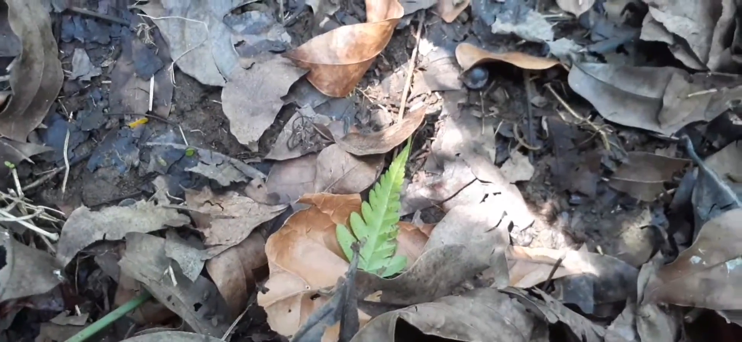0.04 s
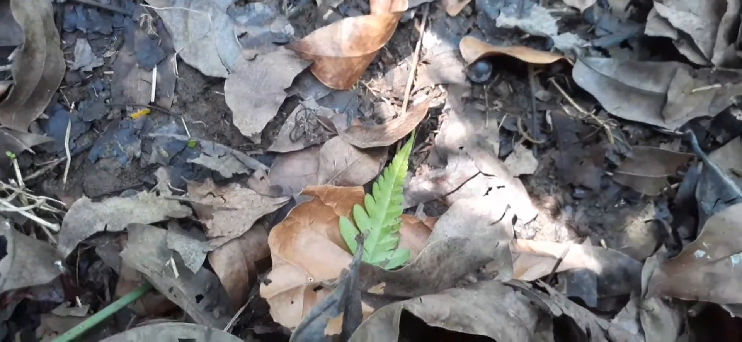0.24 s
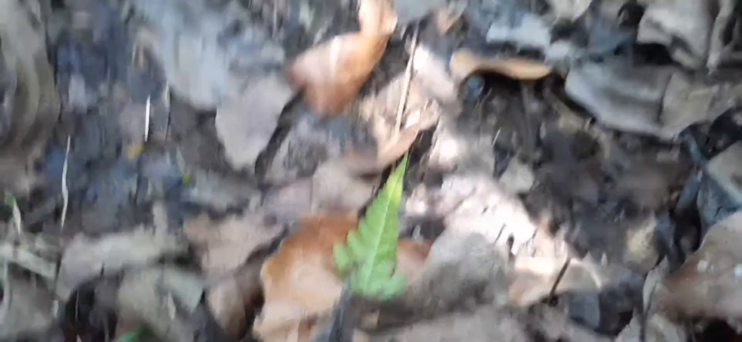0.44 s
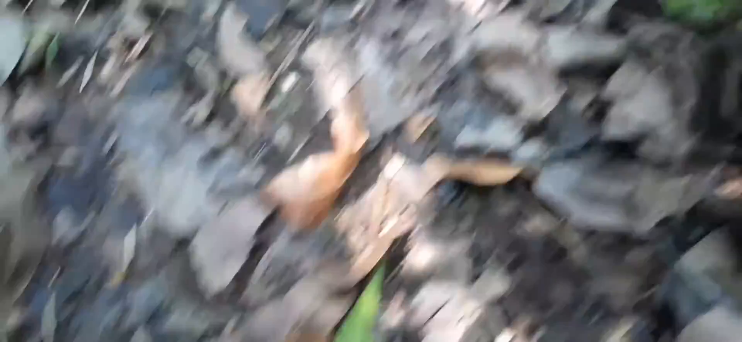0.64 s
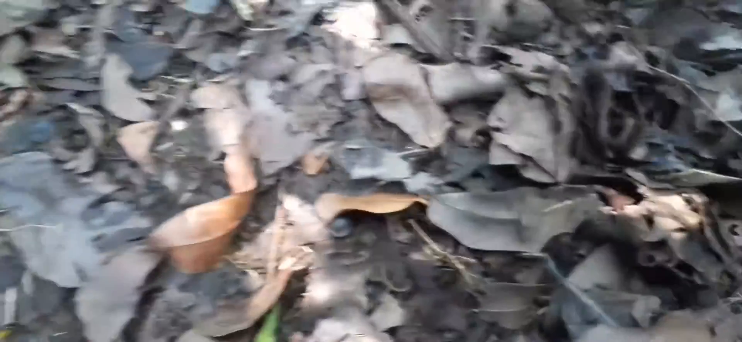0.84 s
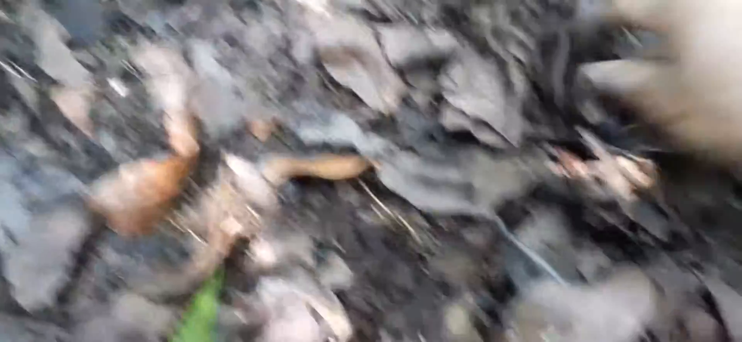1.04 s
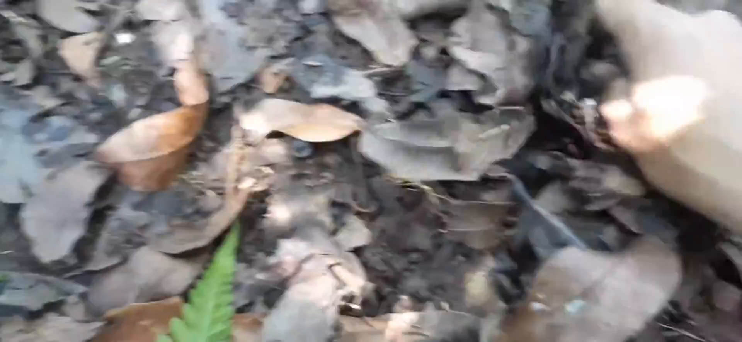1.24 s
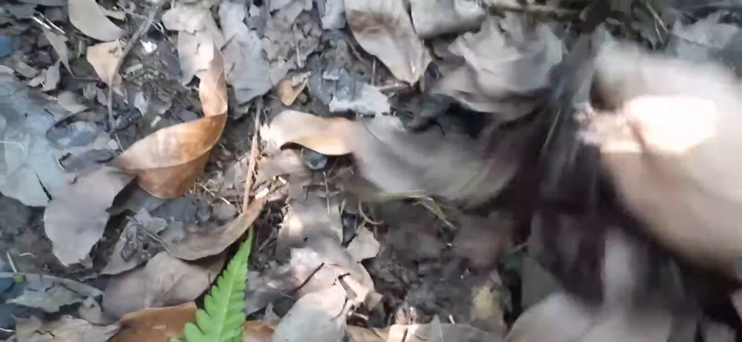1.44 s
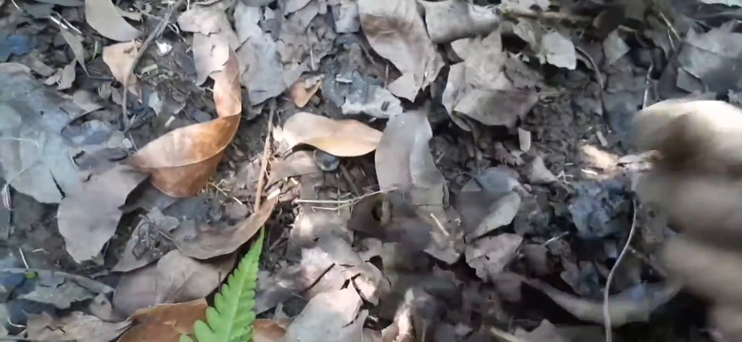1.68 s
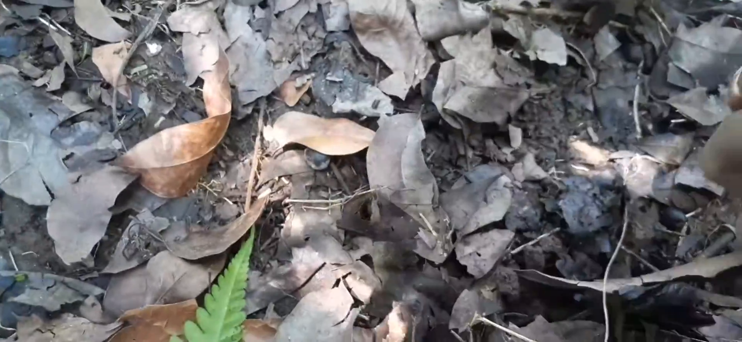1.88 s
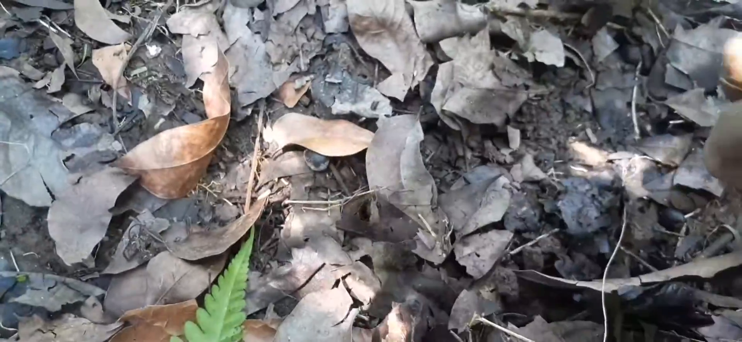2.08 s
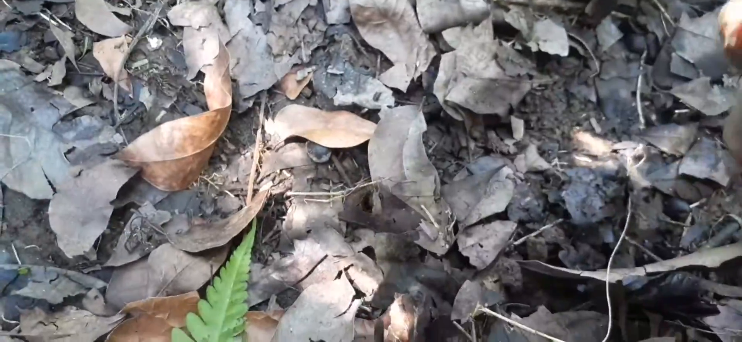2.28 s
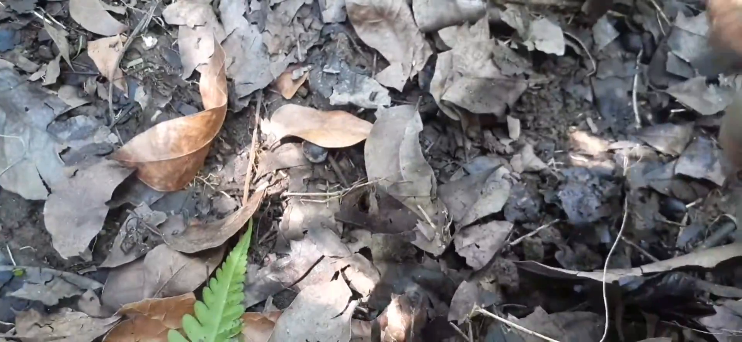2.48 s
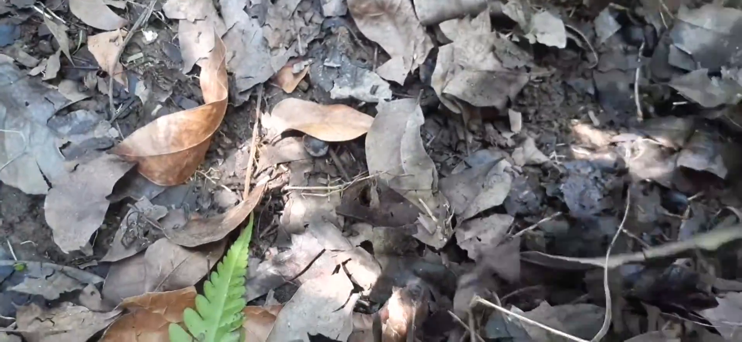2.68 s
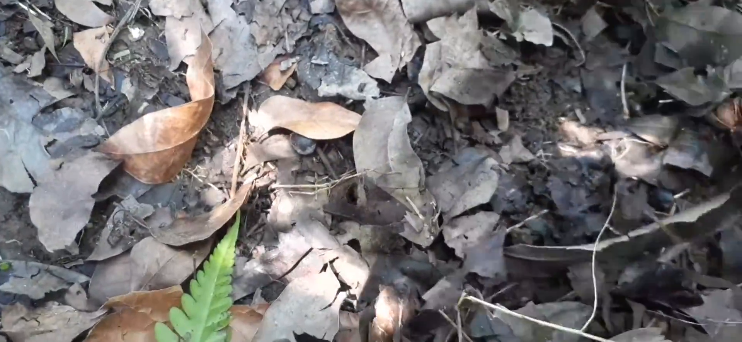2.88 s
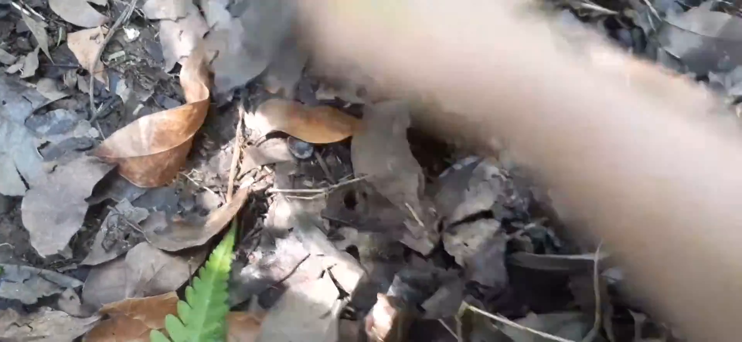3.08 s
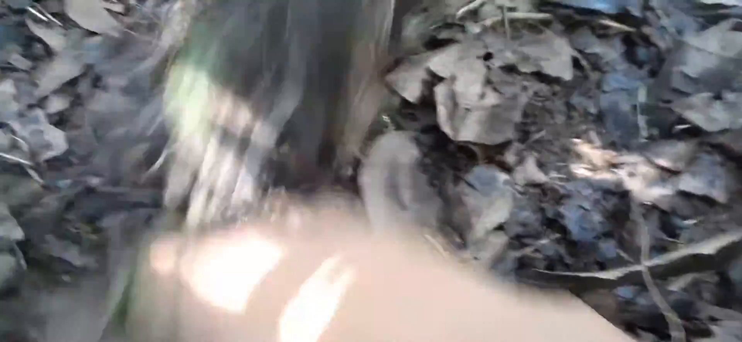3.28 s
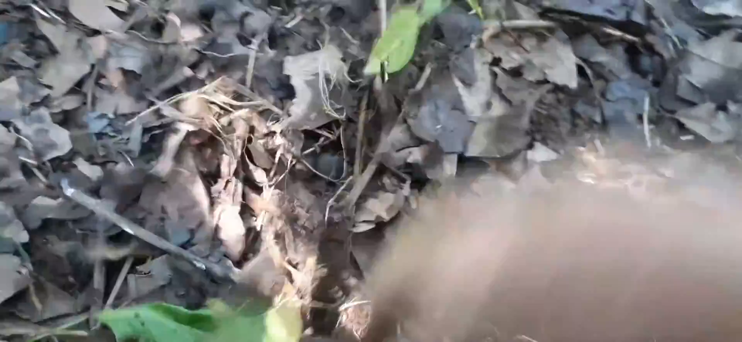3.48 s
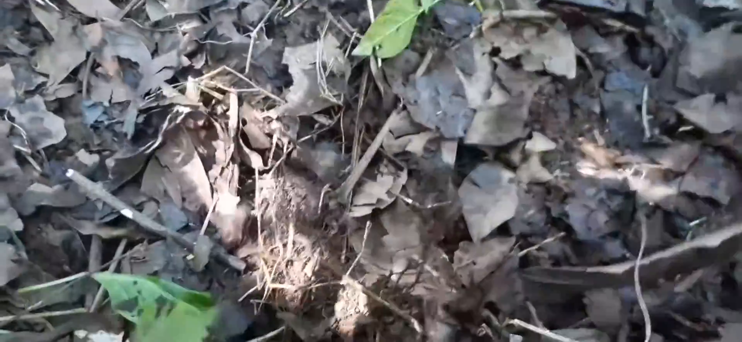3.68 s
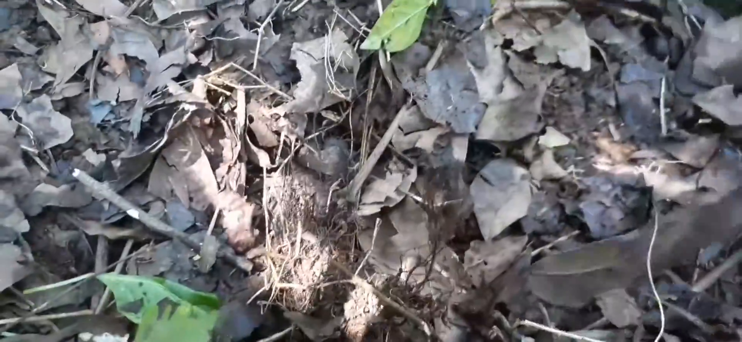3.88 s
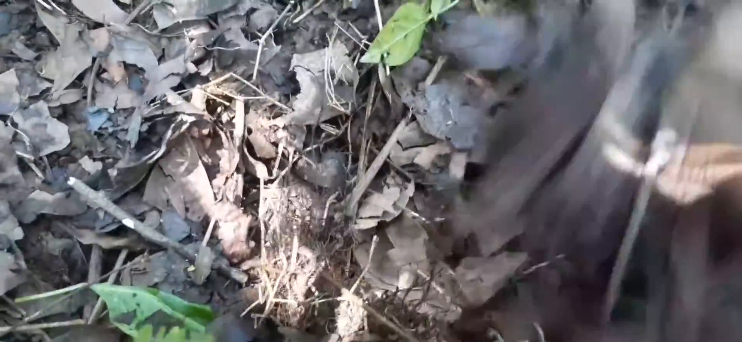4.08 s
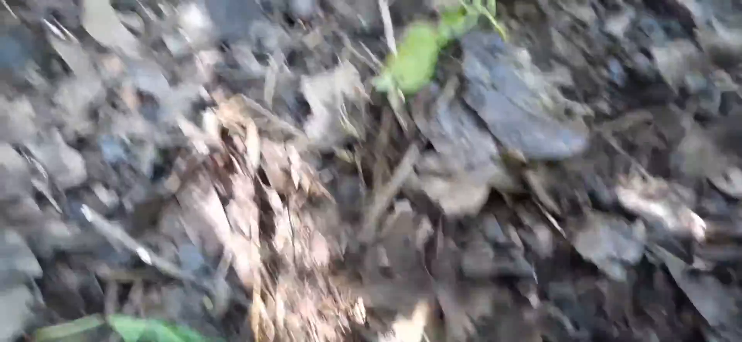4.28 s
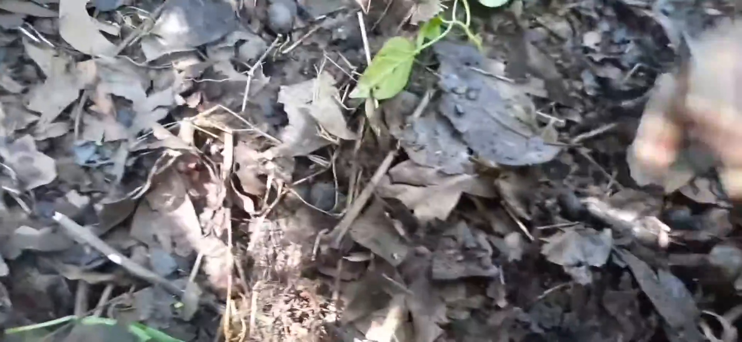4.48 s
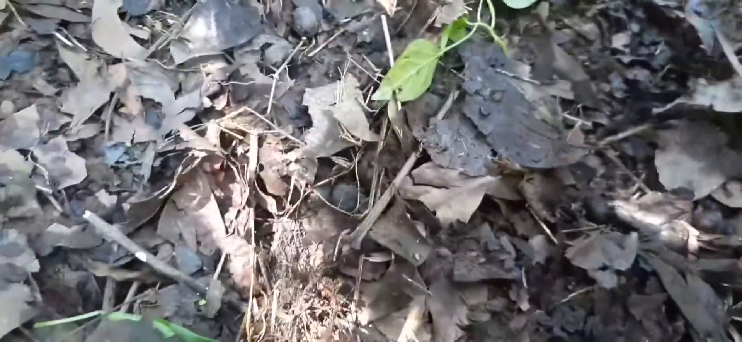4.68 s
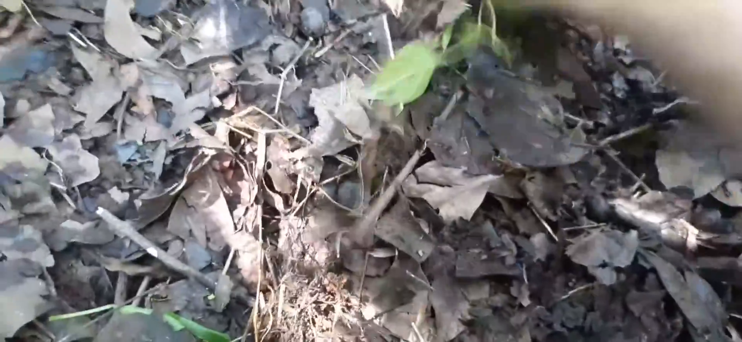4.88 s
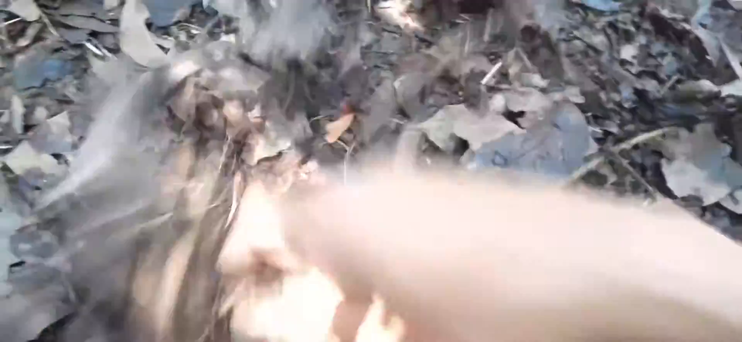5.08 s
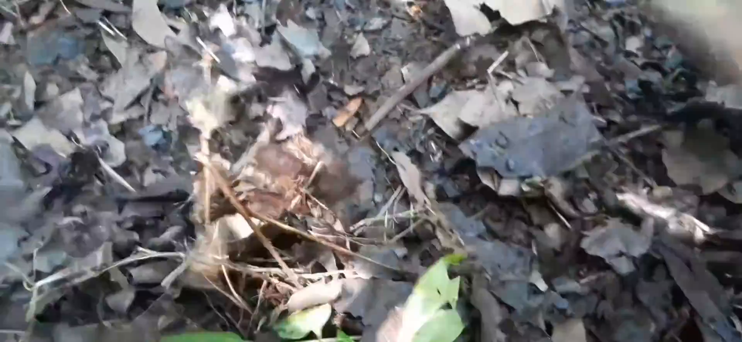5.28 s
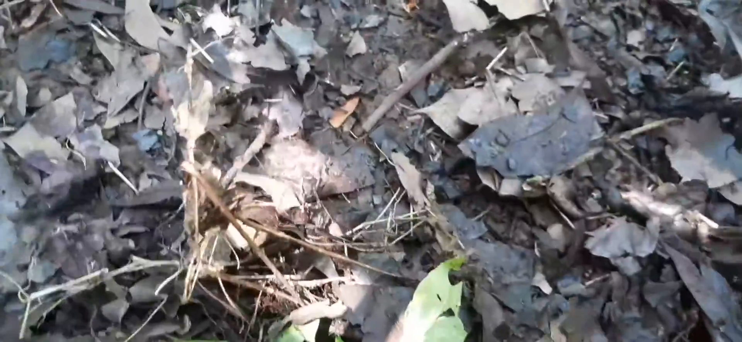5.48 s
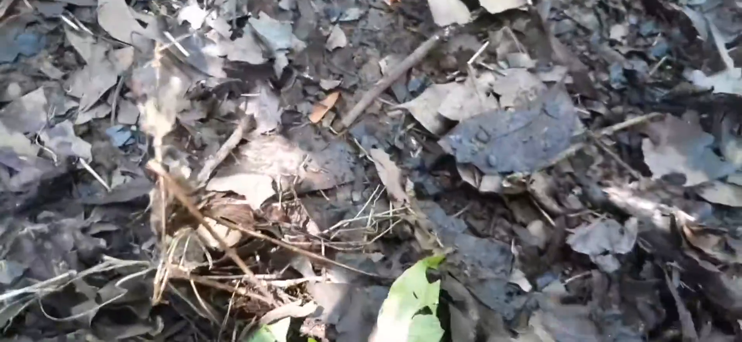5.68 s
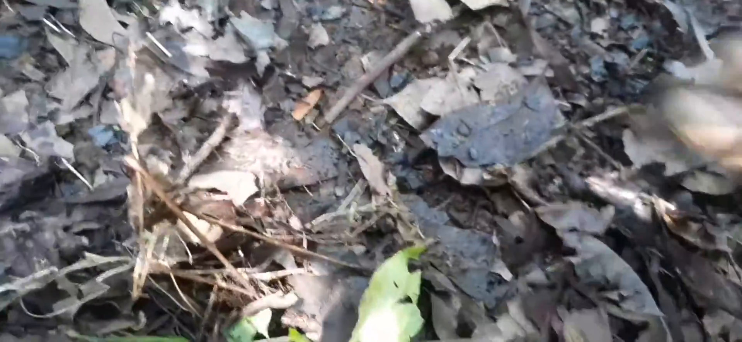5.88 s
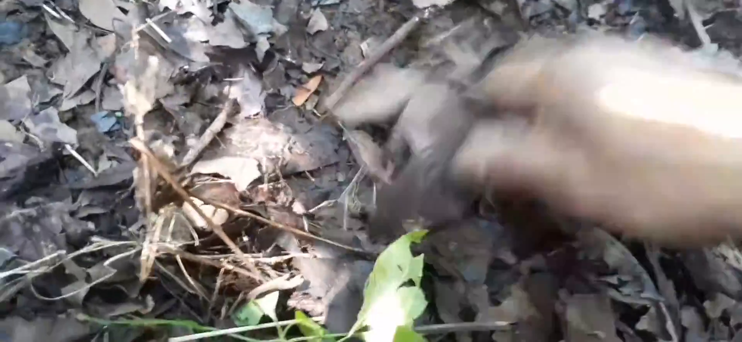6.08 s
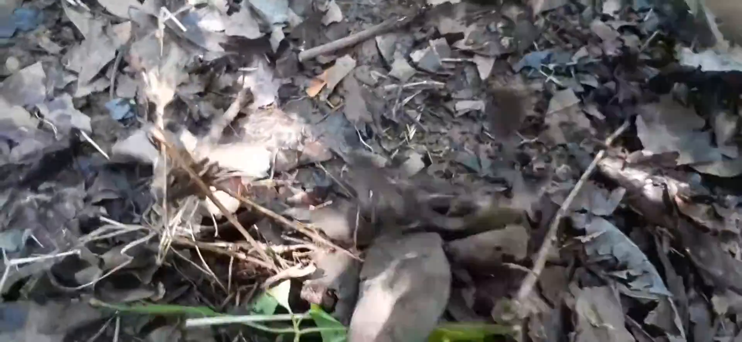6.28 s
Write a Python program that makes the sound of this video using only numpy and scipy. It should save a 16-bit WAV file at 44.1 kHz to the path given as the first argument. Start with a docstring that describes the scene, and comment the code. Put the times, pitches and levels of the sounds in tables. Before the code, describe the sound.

Dry fallen leaves crackle and rustle as a hand pushes them aside in separate, irregular sweeps, heard from very near and slightly to the left. The scratching starts softly, pauses briefly, then returns with fuller crunching and many small cracks of breaking stems. The woodland around is quiet, with only a faint distant engine hum, high insect hiss and softly rumbling air.

```python
"""On a forest floor, close to a small pair of microphone ports, a hand rakes dry leaves in separate pushes.
Each push is a shower of tiny impacts exciting damped resonances: leaf edges crackle, curled leaves
rustle hollow and soil shifts beneath. Single stems and leaves snap with a crack and a short knock.
A far engine drones in harmonics of its firing rate, insects hiss high in the trees, and the air rumbles."""
import sys
import numpy as np
from scipy import signal
from scipy.io import wavfile

SR = 44100
rng = np.random.default_rng(int(sys.argv[2]) if len(sys.argv) > 2 else 0)


def unload_audio(sound):
    """Save the sound as a 16-bit wav file, at the path given as the first command line argument."""
    columns = np.transpose(np.atleast_2d(sound))
    # keep every value between -1 and 1, then stretch to whole-number steps
    steps = np.round(np.clip(columns, -1, 1) * 32767)
    wavfile.write(sys.argv[1], SR, steps.astype(np.int16))


N = 279572

# Pushes of the hand: t/s at full force, rise/s, hold/s, fall/s, crackle level/dB,
# hollow level/dB and soil level/dB (both relative to the crackle), left-right/dB, cupped f/Hz, its lift/dB
PUSHES = [(0.0, 0.3, 0.067, 0.1, -43.5, -10.5, -17.5, 0, 2100, 10),
          (0.083, 0.093, 0.024, 0.14, -41.5, -11.5, -13, 1, 2190, 19),
          (0.139, 0.12, .036, 0.038, -42.5, -12.5, -9.5, 0, 2360, 18.5),
          (0.38, 0.23, 0.01, 0.23, -61, -10, -25, 4, 2200, 0),
          (0.577, 0.15, .03, 0.1, -56.5, -6.5, -18, 5, 2070, 6.5),
          (0.623, 0.038, 0.064, 0.073, -45.5, -8.5, -21.5, 4.5, 1950, 3.5),
          (0.79, 0.27, 0.015, 0.22, -55, -9, -19, 6, 2000, 4.5),
          (1.124, 0.19, 0.036, 0.086, -45, -7.5, -23, 3.5, 2120, 7.5),
          (1.192, 0.089, 0.019, 0.23, -50, -6, -16, 2.5, 2030, 5.5),
          (1.478, 0.16, 0.078, 0.29, -33, -7.5, -20, 1.5, 1850, 8.5),
          (1.659, 0.37, 0.057, 0.074, -42.5, -4, -15, 4, 1710, 0),
          (2.696, 0.029, 0.021, 0.16, -52, 0, -9, 3.5, 1950, 8),
          (3.024, 0.12, 0.047, 0.21, -36, -2.5, -25.5, 6.5, 2080, 0.5),
          (3.13, 0.25, 0.025, 0.52, -27.5, -7, -20.5, 9, 2250, -3),
          (3.325, 0.28, 0.055, 0.33, -29, -7, -13, 6.5, 2420, 4.5),
          (3.487, 0.17, 0.035, 0.19, -37.5, -4, -12, 6.5, 2000, -2),
          (3.712, .12, 0.081, 0.14, -55, -9, -35, 2.5, 2000, 7),
          (3.85, 0.074, 0.029, 0.32, -33.5, -8, -23, 2.5, 1830, -2),
          (3.968, 0.17, 0.032, 0.14, -35, -5.5, -17, 3.5, 1724, 3),
          (4.158, 0.28, 0.08, 0.32, -29, -4.5, -16.5, 3.5, 1930, 2),
          (4.904, 0.2, 0.054, 0.19, -37.5, -6, -22.5, 5.5, 2400, 2.5),
          (5.051, 0.28, 0.034, 0.087, -30, -10.5, -23, 9.5, 2290, -4.5),
          (5.128, 0.099, 0.024, 0.28, -37, -5.5, -20.5, 8.5, 2200, 2),
          (5.494, 0.14, 0.2, 0.17, -32.5, -7.5, -20, 1, 1820, 4),
          (5.806, 0.098, 0.057, 0.22, -45, -6.5, -14.5, -0.5, 1700, 1.5),
          (5.916, 0.093, 0.025, 0.14, -47, -10, -20, 1, 1650, 9),
          (6.122, 0.092, 0.038, 0.11, -33.5, -8, -22.5, 8, 2560, 2.5),
          (6.293, 0.12, .05, .1, -59, -8.5, -24, 9, 2500, 2)]
# Spectra of leaf edges, curled leaves and soil: f/Hz, relative level/dB
CRACKLE_SPECTRUM = [(2500, -16), (3500, -4), (5500, -4.5), (7000, -7), (8200, -3), (9800, 0), (12000, -2.5),
                    (15500, -3.5)]
HOLLOW_SPECTRUM = [(600, -16.5), (900, -8.5), (1400, -0.5), (2100, -1), (2800, 0.5), (4000, -34)]
SOIL_SPECTRUM = [(55, 3), (80, 4.5), (150, -2.5), (300, 0), (550, -2), (900, 3)]
# Acoustic shadow of the body between the ports: f/Hz, factor on the left-right level difference
PORT_SHADOW = [(150, 1), (600, -0.25), (2300, 1.91), (4500, -0.15), (8500, 1.02)]
# Prominent snaps of stems and leaves: t/s, crack level/dB, knock level/dB, knock f/Hz, left-right/dB
STEM_SNAPS = [(0.0085, -36, -55, 2300, -6), (0.031, -31, -57, 2300, -5), (0.036, -26, -62, 2520, -2),
              (0.1325, -38, -53, 2320, -3), (0.147, -38, -35, 2290, -3), (0.155, -28, -39, 2340, -10),
              (0.1648, -24, -35, 2270, -14), (0.4085, -35, -54, 2500, 4), (0.615, -32, -50, 1940, 2),
              (0.7562, -38, -57, 2580, 4.5), (0.8048, -37, -71, 2180, 6), (0.9567, -41.5, -68, 2480, 3),
              (1.0316, -41, -58, 1610, 5), (1.077, -34.5, -55, 2020, -4), (1.3548, -52, -72, 2030, 2),
              (1.3675, -40, -62, 1945, -1), (1.3892, -32, -46, 1920, 2), (1.4247, -22, -32, 1690, 2.0),
              (1.433, -18, -30, 1950, 8), (1.4596, -24, -38, 1760, 2), (1.514, -14, -27.5, 1940, 5),
              (1.663, -24, -33.5, 1607, 4), (1.72, -31, -41, 2370, 9), (1.7785, -43, -51, 1490, 9),
              (1.884, -43, -56, 2200, 17), (1.929, -38, -74, 2575, 4), (1.955, -39, -64, 3460, 5),
              (2.688, -37, -54, 2400, 4), (2.6922, -40, -32.5, 1400, 0), (2.7054, -32, -43, 2090, 9),
              (2.7127, -28, -32, 2090, -4), (2.7715, -44, -54, 2180, -6), (2.937, -37, -54, 1470, 2),
              (2.9766, -25.5, -44, 2630, 8), (3.072, -21, -32, 2000, 5), (3.116, -19, -30, 2000, 9),
              (3.13, -17, -26, 1800, 10), (3.14, -14, -33, 2300, 12), (3.1716, -15, -30, 2080, 12),
              (3.181, -19, -36, 2000, 10), (3.219, -15, -31, 1960, 12), (3.5118, -29, -39, 1990, 9),
              (3.5807, -34, -36, 1950, 8), (3.696, -34.5, -47, 2696, 1), (3.8048, -42, -54, 3200, -12),
              (3.8304, -19, -37, 3270, 4), (3.8432, -12.5, -35, 3370, -1), (3.92, -20, -47, 2000, -1),
              (3.981, -25, -36, 1610, -1), (4.0698, -15, -37, 1540, -7), (4.0783, -15, -33, 2020, 4),
              (4.114, -26, -40, 1720, 2.5), (4.2455, -23, -29, 1945, 4), (4.4272, -36, -40.5, 1224, -1),
              (4.5042, -35, -49, 1966, 7.5), (4.8085, -42, -59, 1948, -1), (4.881, -21, -43, 3485, 2),
              (4.884, -20, -42, 1380, 7), (5.1988, -43, -34.5, 2620, 8), (5.2515, -33, -44, 3290, 10),
              (5.291, -39, -43, 3266, 10), (5.3268, -63, -51, 3370, 18), (5.4236, -35, -44, 2050, 5),
              (5.441, -27, -34, 3250, -1.5), (5.5835, -10.5, -42, 2242, 2), (5.6785, -15, -30, 2170, 2),
              (5.822, -36, -43, 1298, -17), (5.8285, -38, -32, 3900, 0), (5.857, -32, -41, 1300, 3),
              (5.9206, -40, -45, 1690, -6), (5.938, -31, -44, 1390, -7), (5.9645, -36, -60, 1590, -8),
              (6.066, -37, -47, 2005, 7), (6.0756, -29, -47, 2930, 4), (6.0876, -25, -35, 2570, 8),
              (6.096, -27, -40, 2500, 8), (6.1185, -10, -24.5, 3470, 10.5), (6.121, -16, -35, 2400, 12),
              (6.123, -6, -35.5, 2200, 6), (6.125, -22.5, -31, 2600, 11), (6.1365, -17, -41, 2000, 6),
              (6.1668, -15.5, -31, 2670, 4), (6.175, -30, -47, 2000, 7), (6.1812, -22, -45, 2000, 12),
              (6.2457, -43, -52, 1743, 17), (6.3025, -36.5, -43.5, 2675, 17)]
# Course of the engine: t/s, firing f/Hz, level/dB
ENGINE_COURSE = [(0.0, 51.7, -63), (0.35, 53.1, -63), (0.55, 54.2, -83), (1.06, 49.34, -63.5),
                 (1.8, 50.4, -57.5), (1.92, 50, -65), (2.12, 65, -58.5), (2.28, 60.7, -86.5),
                 (2.56, 61.4, -51.5), (2.7, 64.1, -80), (2.96, 60.2, -69), (3.5, 57.7, -64),
                 (3.94, 56.05, -50.5), (4.4, 57.6, -54.5), (5.03, 60.2, -57.5), (5.14, 58.3, -46),
                 (5.33, 63.1, -61), (5.56, 63.5, -46), (6.34, 66.7, -51.5)]
# Harmonics of the engine: multiple of the firing rate, relative level/dB
ENGINE_HARMONICS = [(1, -3), (2, -19), (3, -19)]
# Still air, with rumble below and insects on top: f/Hz, relative level/dB
AIR_SPECTRUM = [(25, -28), (50, 4), (120, 2.5), (250, -4.5), (450, -23.5), (1000, -26), (3000, -28),
                (6000, -85), (9000, -36), (15500, -31)]
# Likeness of the air's noise at the two ports: f/Hz, correlation
AIR_CORRELATION = [(40, 1), (200, 0.71), (1000, 0.15), (4000, 0.053)]


def from_db(db):
    """Amplitude ratio of a level: tenfold for every 20 dB."""
    return 10 ** (np.asarray(db) / 20)


def rms_one(x):
    """Normalisation to unit mean power."""
    return x / np.sqrt(np.mean(x ** 2) + 1e-20)


def in_time(rows):
    """Linear interpolation of each column against the first, t/s; one value a sample."""
    times, *columns = np.transpose(rows)
    return [np.interp(np.arange(N) / SR, times, column) for column in columns]


def at_hz(points, hz):
    """Interpolation of a spectrum on a logarithmic frequency axis."""
    freqs, values = np.transpose(points)
    return np.interp(np.log(hz), np.log(freqs), values)


def drift(rate_hz):
    """Slow random fluctuation of unit rms: noise at every 20th sample through a two-pole low-pass."""
    pole = np.exp(-2 * np.pi * rate_hz * 20 / SR)
    slow = signal.lfilter([1], [1, -2 * pole, pole * pole], rng.standard_normal(N // 20 + 2002))[2000:]
    return np.interp(np.arange(N) / 20, np.arange(len(slow)), rms_one(slow))


def resonance(x, hz, width_hz):
    """Response of a damped oscillator: a two-pole band-pass with unit peak gain."""
    r = np.exp(-np.pi * width_hz / SR)
    feedback = [1, -2 * r * np.cos(2 * np.pi * hz / SR), r * r]
    return signal.lfilter(np.array([1, 0, -1]) * (1 - r * r) / 2, feedback, x + 1e-18)


def sides(pan_db):
    """Direction as a level difference: the two gains for a given left-minus-right level."""
    return from_db(np.array([pan_db / 2, -pan_db / 2]))


def hand(rise_db=47, fall_db=30, settle_db=-19, settle_db_per_s=57, still_db=-82):
    """Incoherent pushes add in power: their total crackle level, then the later columns weighted by power."""
    full_s, rise_s, hold_s, fall_s, crackle_db, *columns = np.transpose(PUSHES)[:, :, None]
    t = np.arange(0, N + 64, 64) / SR
    before_s = np.clip(full_s - t, 0, None)
    after_s = np.clip(t - full_s - hold_s, 0, None)
    swell_db = -rise_db * (before_s / rise_s) ** 1.54   # swells quickly, then rounds off
    settling_db = settle_db - settle_db_per_s * after_s   # leaves go on settling after a push
    decay_db = np.maximum(-fall_db * after_s / fall_s, settling_db)
    power = from_db(crackle_db + swell_db + decay_db) ** 2 + from_db(still_db) ** 2 / len(PUSHES)
    total = power.sum(0)
    means = [(power * column).sum(0) / total for column in columns]
    return in_time(np.transpose([t, 10 * np.log10(total), *means]))


def grains(spectrum, per_s, pan_db, spread_db, q, clump_db, lag_ms, bands, lift_db=lambda hz: 0):
    """Shot noise: random impacts, each exciting one resonance from its own direction; rms near 1."""
    onsets = np.flatnonzero(rng.random(N) < per_s / SR)
    size_db = spread_db * np.minimum(rng.exponential(1, N), 5) + clump_db * drift(20.7)
    size = from_db(size_db) * rng.choice([-1, 1], N) / np.sqrt(per_s)   # fewer grains, each larger
    delay_ms = rng.normal(.03 * pan_db, lag_ms, N)   # the louder port is also the nearer one
    right_arrival = np.clip(np.arange(N) + (delay_ms * SR / 1000).astype(int), 0, N - 1)
    band_of = rng.integers(0, bands, N)[onsets]
    out = np.zeros((2, N))
    for k, hz in enumerate(np.geomspace(spectrum[0][0], spectrum[-1][0], bands)):
        at, clicks = onsets[band_of == k], np.zeros((2, N))
        clicks[0, at] = size[at]
        clicks[1, right_arrival[at]] = size[at]
        ring = resonance(resonance(clicks, hz, hz / q), hz, hz / q)   # twice, for steep skirts
        out += from_db(at_hz(spectrum, hz) + lift_db(hz)) * sides(at_hz(PORT_SHADOW, hz) * pan_db) * ring
    return out / np.sqrt(np.mean(out[0] ** 2 / sides(pan_db)[0] ** 2))


def raking(crackle_db, hollow_db, soil_db, pan_db, cup_hz, cup_lift_db):
    """Impact noise of three grain sizes: a firmer push breaks more leaves a second and sounds brighter."""
    activity = from_db(.4 * np.clip(crackle_db + 34.5, -30, 5))
    tilt_db_per_octave = 0.0621 * np.clip(crackle_db + 20, -15, 10)
    crackle = grains(CRACKLE_SPECTRUM, 18000 * activity, pan_db, spread_db=1.5, q=2.9, clump_db=1.8,
                     lag_ms=.2, bands=12, lift_db=lambda hz: tilt_db_per_octave * np.log2(hz / 6500))
    cup_db = lambda hz: cup_lift_db * np.exp(-(np.log(hz / cup_hz) / .2) ** 2)   # peak of the cupped hollow
    hollow = grains(HOLLOW_SPECTRUM, 7000 * activity, pan_db, spread_db=.14, q=4.46, clump_db=1.5,
                    lag_ms=.11, bands=14, lift_db=cup_db)
    soil = grains(SOIL_SPECTRUM, 1500, pan_db, spread_db=1.5, q=1.66, clump_db=2.5, lag_ms=.25, bands=7)
    beneath = from_db(hollow_db + 1.5) * hollow + from_db(soil_db - 0.5) * soil
    return from_db(crackle_db) * (crackle + beneath)


def snaps(rows, crack_s=0.00067, swell_s=0.00016, rattle_s=0.0054, knock_cycles=5.3):
    """Fracture transients: a broadband crack, and a damped knock at the pitch of the stem or curled leaf."""
    length = 1000
    t = np.arange(length) / SR
    cracks, knocks = np.zeros((2, 2, N + length))
    envelope = (1 - np.exp(-t / swell_s)) * (1.44 * np.exp(-t / crack_s) + 0.23 * np.exp(-t / rattle_s))
    for start_s, crack_db, knock_db, hz, pan_db in rows:
        noise = rng.standard_normal((3, length))
        i, place = round(start_s * SR), sides(pan_db)[:, None]
        cracks[:, i:i + length] += place * from_db(crack_db) * noise[:2] * envelope
        burst = (noise[2] + .5 * noise[:2]) * np.exp(-t * hz / knock_cycles)   # mostly alike at both ports
        burst[:, :3] += 3   # the first blow is one clean pulse
        ring = resonance(burst, hz, 0.28 * hz)   # broad: the leaf hardly rings
        knocks[:, i:i + length] += place * from_db(knock_db + 5) * ring / np.abs(ring).max()
    bright = resonance(resonance(cracks, 9800, 8700), 9800, 8700)
    return (from_db(0.5) * bright + knocks)[:, :N]


def small_snaps(crackle_db, pan_db, count=150):
    """A random point process of lesser fractures: rows of snaps whose levels follow the crackle."""
    at = (rng.random(count) * N).astype(int)
    scatter = rng.standard_normal((count, 4)).T
    crack_db = crackle_db[at] + 6 + 3 * scatter[0]
    knock_db = crackle_db[at] - 8 + 4 * scatter[1]
    knock_hz = 2200 * np.exp(0.15 * scatter[2])
    return np.transpose([at / SR, crack_db, knock_db, knock_hz, pan_db[at] + 4 * scatter[3]])


def engine():
    """Periodic firing gives a harmonic series, which wavers on its way through the air."""
    firing_hz, level_db = in_time(ENGINE_COURSE)
    phase = 2 * np.pi * np.cumsum(firing_hz + 1.56 * drift(4.7)) / SR
    port_phase = phase + 0.25 * drift(2.7) * [[1], [-1]]   # not quite alike at the two ports
    return sum(np.sqrt(2) * from_db(level_db + db + 1.7 * drift(15)) * np.sin(k * port_phase)
               for k, db in ENGINE_HARMONICS)


def insects(band_hz=(8940, 11350), level_db=-66.5):
    """A diffuse field: high hiss from all around, uncorrelated at the ports and flickering a little."""
    band = signal.butter(3, band_hz, "band", fs=SR, output="sos")
    gain = from_db(level_db + 0.83 * drift(4.8))
    return gain * rms_one(signal.sosfilt(band, rng.standard_normal((2, N))))


def air(level_db=-64.5, flicker_db=1.7):
    """Ambient noise in flickering bands: the longer the wavelength, the more alike it is at the ports."""
    out, edges_hz = 0, np.geomspace(22, 16000, 34)
    white = rng.standard_normal((2, 2, N))   # neighbouring bands get unrelated noise
    for k, (low, high) in enumerate(zip(edges_hz, edges_hz[1:])):
        band = signal.butter(2, [low, high], "band", fs=SR, output="sos")
        mid, side = signal.sosfilt(band, white[k % 2])
        hz = np.sqrt(low * high)
        alike = at_hz(AIR_CORRELATION, hz)
        gain = from_db(at_hz(AIR_SPECTRUM, hz) + flicker_db * drift(9.8))
        out = out + gain * (np.sqrt(1 + alike) * mid + np.sqrt(1 - alike) * side * [[1], [-1]])
    return from_db(level_db) * rms_one(out)


def scene():
    """Superposition: hand and leaves in front; engine, insects and air behind."""
    crackle_db, hollow_db, soil_db, pan_db, cup_hz, cup_lift_db = hand()
    rustle = raking(crackle_db, hollow_db, soil_db, pan_db, cup_hz, cup_lift_db)
    fractures = snaps([*STEM_SNAPS, *small_snaps(crackle_db, pan_db)])
    return rustle + fractures + engine() + insects() + air()


def record(dry):
    """Band limiting: a steep elliptic low-pass removes the treble above 15720 Hz."""
    return signal.sosfilt(signal.ellip(10, .5, 70, 15720, fs=SR, output="sos"), dry)


dry = scene()
out = record(dry)
unload_audio(out)
```